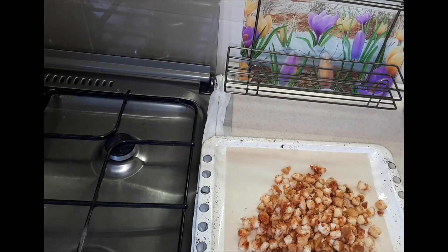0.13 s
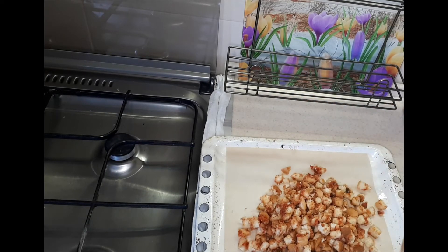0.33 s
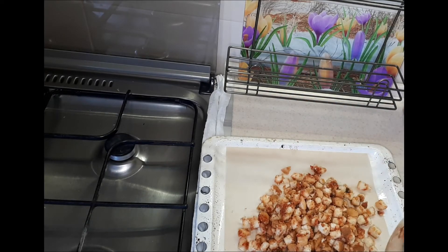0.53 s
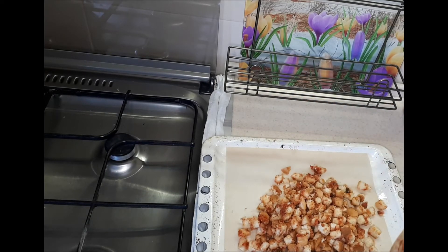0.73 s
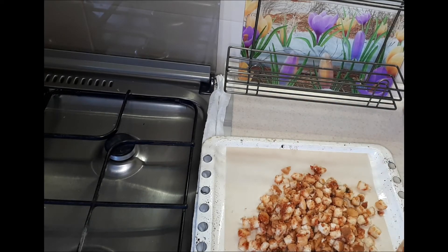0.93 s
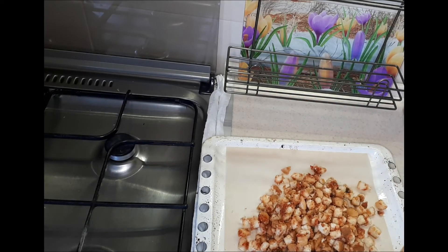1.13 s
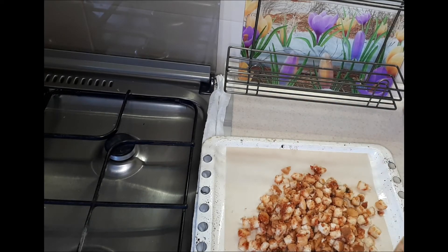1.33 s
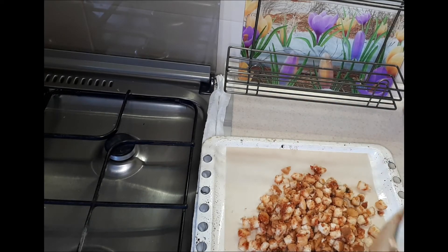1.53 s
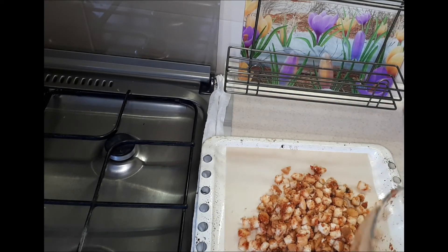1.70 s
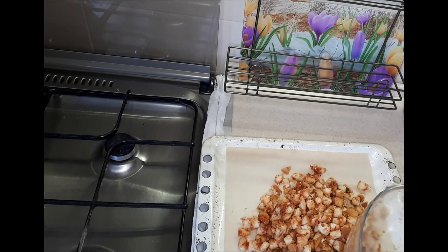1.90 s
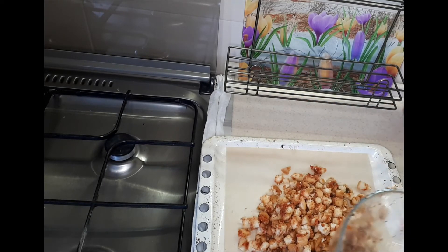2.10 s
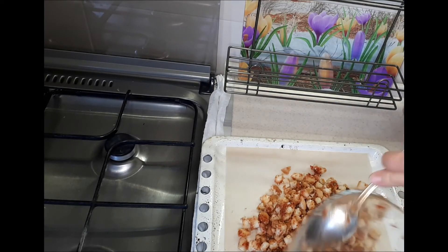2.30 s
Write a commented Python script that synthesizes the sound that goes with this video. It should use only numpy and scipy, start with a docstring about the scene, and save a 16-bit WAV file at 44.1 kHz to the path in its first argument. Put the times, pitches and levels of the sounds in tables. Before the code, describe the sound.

Dry croutons scrape, the tray knocks, then a glass bowl clinks and clanks against it

```python
"""A low wavering hum and a thin hiss come first, and croutons soon scrape over them.
A clack on the worktop, light ticks and knocks of a baking tray follow, then a faint swish as a glass
bowl swings over; it clinks, rings and clanks on the tray in a small, hard-walled kitchen.
Struck objects are sums of decaying modes, sliding is a burst of tiny contacts, and the steady sounds
are filtered noise and a tone; a decaying noise response serves as the room."""
import sys
import numpy as np
from scipy import signal
from scipy.fft import rfft, irfft
from scipy.io import wavfile
from scipy.ndimage import uniform_filter1d

SR = 44100
rng = np.random.default_rng(int(sys.argv[2]) if len(sys.argv) > 2 else 0)


def wav_out(sig):
    """Save sig, one row per channel (or a flat mono array), as 16-bit PCM at SR to the path in sys.argv[1]."""
    wavfile.write(sys.argv[1], SR, np.round(np.clip(np.atleast_2d(sig).T, -1, 1) * 32767).astype(np.int16))


N = 108133  # length in samples


def amp(db):
    """Level law: decibels to amplitude gain."""
    return 10 ** (np.asarray(db) / 20)


def evened(x):
    """Power normalisation: scales to rms 1."""
    return x / np.sqrt(np.mean(x ** 2) + 1e-20)


def read(points, hz):
    """Logarithmic frequency scale: interpolates a table along it."""
    f, value = np.transpose(points)
    return np.interp(np.log(hz + 1), np.log(f + 1), value)


def add(mix, s, sound):
    """Superposition: adds a sound in place from time s, cut at the end of the mix."""
    part = mix[:, round(s * SR):][:, :sound.shape[-1]]
    part += sound[..., :part.shape[1]]


def colour(x, points, size=2048):
    """Minimum-phase filtering: the Hilbert transform of the log gain supplies the phase."""
    hz = abs(np.fft.fftfreq(size, 1 / SR))
    log_gain = np.log(amp(read(points, hz)))
    response = np.fft.ifft(np.exp(np.conj(signal.hilbert(log_gain)))).real
    return signal.fftconvolve(x, response)


def click(body):
    """Impulse response: an ideal impulse takes on the body's spectrum."""
    return colour(np.ones(1), body)


def blend(a, b, likeness):
    """Interchannel coherence: the right channel shares part of the left; negative means inverted."""
    return np.array([a, likeness * a + np.sqrt(1 - likeness ** 2) * b])


def pair(size, likeness, points=None):
    """Diffuse field: stereo noise whose coherence depends on frequency."""
    hz = np.fft.rfftfreq(size, 1 / SR)
    a, b = rfft(rng.standard_normal((2, size)))
    spectrum = blend(a, b, np.clip(read(likeness, hz), -1, 1))
    if points is not None:
        spectrum = spectrum * amp(read(points, hz))
    return irfft(spectrum, size)


def narrow(hz, width_hz, likeness):
    """Modulated noise: a narrow band around a steady or moving pitch."""
    offset = np.fft.fftfreq(N, 1 / SR)
    noise = rng.standard_normal((2, N)) + 1j * rng.standard_normal((2, N))
    # the gain is half at the edges of the width
    envelope = np.fft.ifft(np.fft.fft(noise) / (1 + (2 * offset / width_hz) ** 2))
    carrier = np.exp(2j * np.pi * np.cumsum(hz * np.ones(N)) / SR)
    a, b = (envelope * carrier).real
    return evened(blend(a, b, likeness))


LATE_LOSS_DB = 5  # extra loss reached at a quarter of a second


def dying(t, t60):
    """Exponential decay, steepened by a loss in dB that grows with time squared."""
    return amp(-60 * t / t60 - LATE_LOSS_DB * (4 * t) ** 2)


# likeness of left and right in the diffuse sound: (frequency [Hz], coherence [-1 to 1])
LIKENESS = [(80, 0.77), (300, 0.71), (600, 0.56), (1200, -0.25), (2500, -0.013), (8000, -0.0038)]
# spectrum of the room tone: (frequency [Hz], relative level [dB])
FLOOR_SPECTRUM = [(20, -23.5), (60, -5), (130, 0), (200, -10.5), (280, -10.5), (400, -16.5), (1000, -19.5),
                  (2500, -23), (6000, -30), (10000, -32), (16000, -29.5)]
# slow changes of the room tone: (time [s], level relative to FLOOR_DB [dB])
FLOOR_LEVEL = [(0, -0.5), (.7, 1), (1.5, -2), (1.75, -1), (2.1, 2), (2.45, -1)]
FLOOR_DB = -67.5


def room_tone():
    """Stationary noise: a coloured diffuse field with a slowly changing level."""
    level_db = FLOOR_DB + np.interp(np.arange(N) / SR, *np.transpose(FLOOR_LEVEL))
    return amp(level_db) * evened(pair(N, LIKENESS, FLOOR_SPECTRUM))


# bands of the thin hiss: (centre [Hz], width [Hz], level [dB], left-right likeness [0 to 1])
HISS_BANDS = [(7800, 1600, -79, 0.24), (7890, 72, -76, 0.23), (13160, 32, -86, 0.093)]


def hiss():
    """Band-limited noise: steady high bands add up to a thin hiss."""
    return sum(amp(db) * narrow(hz, width, likeness) for hz, width, db, likeness in HISS_BANDS)


# level course of the hum: (time [s], level relative to HUM_DB [dB])
HUM_LEVEL = [(0.0, -60), (0.16, -63), (0.46, -53), (0.81, -63.5), (0.89, -49.5), (0.93, -75), (1.05, -56),
             (1.08, -63), (1.19, -53.5), (1.75, -67), (1.77, -56), (1.96, -64), (2.01, -53.5), (2.05, -66),
             (2.24, -58), (2.29, -72), (2.37, -55.5), (2.45, -62)]
HUM_HZ, HUM_WANDER_HZ, HUM_DB = 91.4, 3.68, -1  # wander is the rms deviation
HUM_NOISE_DB, HUM_WIDTH_HZ = -5, 41  # noise relative to the tone


def hum():
    """Frequency modulation: a low sine wanders in pitch inside a band of noise."""
    t = np.arange(N) / SR
    wander = evened(uniform_filter1d(rng.standard_normal(N), size=3000))
    phase = 2 * np.pi * np.cumsum(HUM_HZ + HUM_WANDER_HZ * wander) / SR
    tone = np.sqrt(2) * np.sin(phase)  # rms 1
    noise = amp(HUM_NOISE_DB) * narrow(HUM_HZ, HUM_WIDTH_HZ, 0.82)
    return amp(HUM_DB + np.interp(t, *np.transpose(HUM_LEVEL))) * (tone + noise)


# reverberation of the kitchen: (frequency [Hz], t60 before the late loss [s])
KITCHEN_T60 = [(120, 0.33), (400, 0.41), (1200, 0.39), (3000, 0.36), (7000, 0.33), (15000, 0.23)]
DIRECT, EARLY = 0.1, 0.23  # gains of the direct sound and of the early reflections
EARLY_T60_S, BUILD_S = 0.041, 0.00098  # early decay time, time constant of the build-up
CONTACT_DB = 13  # gain of all sounds sent into the room


def kitchen(x, direct=DIRECT, early=EARLY, size=32768):
    """Reverberation: convolution with direct sound, early cluster and tail, drawn anew each time."""
    t = np.arange(size) / SR
    hz, at, z = signal.stft(pair(size, LIKENESS), SR, nperseg=256)
    late_decay = dying(at, read(KITCHEN_T60, hz)[:, None])
    early_decay = early * amp(-60 * at / EARLY_T60_S)
    z = z * np.hypot(late_decay, early_decay)
    response = signal.istft(z)[1][:, :size] * (1 - np.exp(-t / BUILD_S))
    response /= np.linalg.norm(response[0])  # left reflections have energy 1
    response[0, 0] += direct
    response[1, rng.integers(1, 10)] += direct  # a few samples later on the right
    return amp(CONTACT_DB) * signal.fftconvolve(x[None], response, axes=1)


GRAINS_PER_S, GRAIN_SPREAD_DB = 1200, 5.5


def grains(length_s):
    """Shot noise: random contacts of uneven size and sign swell and fade; energy 1."""
    u = np.linspace(0, 1, max(int(length_s * SR), 20))
    chance, size, sign = rng.random((3, SR // 2))[:, :len(u)]
    strength = amp(-GRAIN_SPREAD_DB * np.log(size + 1e-9))  # exponentially spread in dB
    x = (chance < GRAINS_PER_S / SR) * strength * np.sign(sign - 0.5)
    x = x * np.sqrt(u * (1 - u))
    return x / (np.linalg.norm(x) + 1e-9)


# sliding and handling of the croutons:
# (time [s], length [s], level before the room gain [dB], grit relative to rub [dB])
SCRAPES = [(0.099, 0.16, -41, -5.5), (0.215, 0.048, -20.5, -13.5), (0.243, 0.032, -27, 4.5),
           (0.292, 0.024, -24.5, -12), (0.435, 0.027, -28, -19.5), (0.556, 0.31, -46, -20)]
# spectrum of the dull rubbing: (frequency [Hz], relative level [dB])
RUB = [(35, -31), (70, 9), (170, 8), (240, 4), (330, 8.5), (560, 7), (740, 3), (1100, -11), (1900, -2.5),
       (2400, -15.5), (3100, -13), (4500, -16), (15000, -55)]
# spectrum of the crisp grit: (frequency [Hz], relative level [dB])
GRIT = [(300, -25), (1200, -20), (1900, 2.5), (2400, -3.5), (2750, 5.5), (3100, 5), (3500, -3.5),
        (4500, -10), (5200, -0.5), (5800, -10), (6400, -3), (7700, -1.5), (9100, -17), (10500, -4),
        (12500, -15), (15500, -12)]


def scrape(length_s, db, grit_db):
    """Sliding friction: many dry contacts form a dull rub with crisp grit on top."""
    rub = colour(grains(length_s), RUB)
    grit = amp(grit_db) * colour(grains(length_s), GRIT)
    return amp(db) * kitchen(rub + grit)


RING_RISE_S = 0.00029  # rise time constant of the ring in sharp hits
BLUR, BLUR_HZ = 0.85, 47  # depth and bandwidth of the wavering


def ringing(modes, rise_s):
    """Modal superposition: reflections make each dying mode waver, differently on each side."""
    t = np.arange(SR // 2) / SR
    offset, out = np.fft.fftfreq(len(t), 1 / SR), 0
    for hz, db, t60 in modes:
        random_phase = 2j * np.pi * rng.random((2, len(t)))
        waver = np.fft.ifft(np.exp(random_phase - (offset / BLUR_HZ) ** 2))
        fade = (1 - np.exp(-t / rise_s)) * dying(t, t60)
        steady = np.exp(2j * np.pi * rng.random((2, 1)))
        swing = fade * (steady + BLUR * waver / np.std(waver))
        # wavering leaves the mode's energy unchanged
        swing *= np.linalg.norm(fade) / np.linalg.norm(swing, axis=1, keepdims=True)
        out = out + amp(db) * (swing * np.exp(2j * np.pi * hz * t)).real
    return out


def hit(body, modes, ring_db=0, direct=DIRECT, early=EARLY):
    """Impulsive excitation: a click in the room sets off the object's modes."""
    sound = kitchen(click(body), direct, early)
    add(sound, 0, amp(ring_db) * ringing(modes, RING_RISE_S))
    return sound


# hard clacks on the worktop: (time [s], level of click and ring together [dB])
CLACKS = [(0.8198, -11)]
# spectrum of their click: (frequency [Hz], relative level [dB])
CLACK_BODY = [(40, -23), (220, -8), (350, -0.5), (650, 2), (950, -4), (1250, 3), (1600, 2), (2000, 9),
              (2400, -4), (3200, 7.5), (3600, 2.5), (4100, -7), (5200, -11), (5800, -13), (7500, -15.5),
              (9000, -30.5), (15500, -27)]
# their ring: (frequency [Hz], relative level [dB], t60 before the late loss [s])
CLACK_MODES = [(715, -41, 0.61), (1604, -37, 0.77), (1850, -35, 0.43), (2000, -34.5, 0.78),
               (3110, -33, 0.51), (3143, -24.5, 0.38), (3220, -33.5, 0.59), (5045, -41.5, 0.67)]


def clack(db):
    """Hard impact: a broad click and quiet modes, as on the worktop."""
    return amp(db) * hit(CLACK_BODY, CLACK_MODES)


# light glassy ticks: (time [s], level of click and ring together [dB],
# extra ring level [dB], tilt of the click [dB per octave])
TICKS = [(1.0114, -30.5, 1.5, -1), (1.5721, -43, -22, 0.5)]
# spectrum of their click before the tilt: (frequency [Hz], relative level [dB])
TICK_BODY = [(200, -3), (1500, -8), (2700, 3), (3400, 7.5), (4500, -3), (5500, -2), (7200, 9.5),
             (8800, -11), (11200, -6), (12500, -11.5), (15500, -10)]
# their ring: (frequency [Hz], relative level [dB], t60 before the late loss [s])
TICK_MODES = [(3160, -20, 0.18), (6100, -21.5, 0.35), (6090, -22, .36), (7200, -31, 0.2),
              (7960, -21.5, 0.22), (9200, -33, 0.37), (10460, -27, .25), (11160, -23, .22),
              (11380, -30, 0.28), (14900, -30, .22)]
PRESENCE_HZ = 2960  # pivot of the tilt, and reference point of a knock's force


def tick(db, ring_db, tilt_db):
    """Light impact: a spectrally tilted click excites high glassy modes."""
    body = [(hz, level + tilt_db * np.log2(hz / PRESENCE_HZ)) for hz, level in TICK_BODY]
    return amp(db) * hit(body, TICK_MODES, ring_db)


# tray knocks: (time [s], level before the room gain [dB], bass [dB], middle [dB], treble [dB],
# extra ring level [dB], chatter length [s])
KNOCKS = [(1.1328, -7.5, 3.5, -0.5, -1, -7.5, 0.00925), (1.154, -10.5, 3.5, 1, -6, -5, 0.0052),
          (1.21, -11.5, 3.5, -1, -10.5, -5.5, 0.044), (1.313, -17, 2.5, 2, -18, -7, .004)]
# spectrum of the dull part: (frequency [Hz], relative level [dB])
THUD = [(35, -42), (70, -30), (130, -5), (230, -5.5), (340, -0.5), (680, 0.5), (950, 1.5), (1350, 11.5),
        (2000, 0.5), (2400, -3), (3000, 1), (3550, 6), (3900, -3.5), (4300, 5.5), (4800, -0.5), (5200, -2),
        (6800, -6), (7800, -1.5), (9000, -10.5), (15500, -9)]
# tray modes: (frequency [Hz], level relative to RING_DB [dB], t60 [s])
TRAY_MODES = [(328, -11, 0.065), (620, -17, 0.047), (705, -10.5, 0.19), (1211, -7, 0.063), (1353, 8, 0.021),
              (1574, -10, 0.046), (2070, -8.5, 0.081), (2956, -8.5, 0.16), (3165, 2.5, 0.056),
              (3200, -11, 0.14), (3577, -1, 0.047), (4270, -1, 0.12), (5090, -8, 0.11), (8060, -6.5, 0.073)]
BASS_HZ, MIDDLE_HZ, TREBLE_HZ = 330, 1160, 11000
CHATTER, RING_DB = 0.81, -29  # grains beside a unit first contact; base level of the ring


def ring(modes):
    """Modal superposition: exponentially dying sines of a struck object."""
    t = np.arange(SR // 2) / SR
    return sum(amp(db - 60 * t / t60) * np.sin(2 * np.pi * (hz * t + rng.random()))
               for hz, db, t60 in modes)


def strike(body, modes, ring_db):
    """Impulse response of a struck object: its click and its modes together."""
    sound, start = amp(RING_DB + ring_db) * ring(modes), click(body)
    sound[:len(start)] += start
    return sound


def knock(db, bass_db, middle_db, treble_db, ring_db, length_s):
    """Source and resonator: a bump with brief chatter drives the tray; softer contacts are duller."""
    contact = CHATTER * grains(length_s)
    contact[0] += 1
    force_spectrum = [(BASS_HZ, bass_db), (MIDDLE_HZ, middle_db), (PRESENCE_HZ, 0), (TREBLE_HZ, treble_db)]
    force = colour(contact / np.linalg.norm(contact), force_spectrum)
    return amp(db) * kitchen(signal.fftconvolve(force, strike(THUD, TRAY_MODES, ring_db)))


# faint swish as the bowl swings over: (time [s], centre [Hz], level [dB])
SWISH = [(1.7, 1385, -83), (1.82, 1450, -77), (1.92, 1780, -70.5), (2.031, 1780, -70.5),
         (2.141, 1567, -64.5), (2.252, 1480, -66)]
SWISH_WIDTH_HZ = 560


def swish():
    """Moving noise band: it fades in, glides in pitch and level, then holds its last values."""
    at, hz, db = np.transpose(SWISH)
    t = np.arange(N) / SR
    onset = np.clip((t - at[0]) * 20, 0, 1)
    return amp(np.interp(t, at, db)) * onset * narrow(np.interp(t, at, hz), SWISH_WIDTH_HZ, 0)


# contacts of the glass rim: (time [s], level before the room gain [dB])
CLINKS = [(2.1815, -2.5), (2.1835, -2.5), (2.1865, -5), (2.205, -19)]
# crack of the contact on glass: (frequency [Hz], relative level [dB])
CRACK = [(35, -37), (110, -14), (250, -19), (450, -9), (750, 4), (1100, -1), (1600, 8.5), (2200, 1.5),
         (2800, 5.5), (4300, 1), (4950, 7), (5800, -2), (7900, -1), (10500, -4), (15500, -5.5)]


def clink(db):
    """Impulsive contact: a bright crack of the glass rim, reverberated by the room."""
    return amp(db) * kitchen(click(CRACK))


# the bowl rings on: (start time [s], level of all modes together [dB])
BOWL_START = (2.184, -21)
# bowl modes: (frequency [Hz], relative level [dB], t60 before the late loss [s])
BOWL_MODES = [(942.2, -10, 0.46), (1758, -5, .28), (1715, -5, 0.56), (1967, -3.5, 0.27), (2600, 1.5, 0.43),
              (2625, 5, 0.47), (2721, -1.5, 0.47), (2712, -8, 0.52), (2970, -8, 0.31), (3712, 3.5, 0.5),
              (3850, -5, 0.3), (4860, -21, .24), (4870, 0.5, 0.4), (5240, -15, 0.54), (6220, -5, 0.22),
              (7530, 1, 0.2), (8300, 2.5, 0.085), (12120, -13, .2), (12615, -3, 0.16)]
GLASS_RISE_S = 0.0019  # rise time constant


def bowl_ring(db):
    """Free vibration: the glass bowl's modes rise quickly and die away."""
    return amp(db) * ringing(BOWL_MODES, GLASS_RISE_S)


# clanks of the held bowl on the tray: (time [s], level of click and ring together [dB])
CLANKS = [(2.4245, 0.5)]
# spectrum of their click: (frequency [Hz], relative level [dB])
CLANK_BODY = [(40, -52), (200, -19), (420, -21.5), (650, -1), (870, -4), (1100, -5.5), (1600, 7.5),
              (2600, 4.5), (4000, 9), (4400, -3.5), (5000, 4.5), (6700, -9), (7500, 9), (8600, -7),
              (13400, -7), (15500, -13)]
# their short ring: (frequency [Hz], relative level [dB], t60 before the late loss [s])
CLANK_MODES = [(679, -33, 0.34), (863, -31, 0.18), (1612, -18, 0.11), (1945, -32, .2), (2710, -25, 0.17),
               (3110, -11.5, 0.049), (3156, -16.5, 0.087), (3895, -22, 0.17), (5050, -26.5, 0.14),
               (6273, -21.5, 0.15), (6870, -25, 0.13), (7720, -26, 0.19)]


def clank(db):
    """Damped impact: short modes, with stronger direct sound and early reflections."""
    return amp(db) * hit(CLANK_BODY, CLANK_MODES, direct=0.2, early=1.6)


LEFT_DB = 1  # left raised and right lowered by this much


def scene():
    """Superposition: all contacts over the steady sounds, a little to the left."""
    mix = swish() + room_tone() + hiss() + hum()
    events = [(knock, KNOCKS), (clack, CLACKS), (clink, CLINKS), (bowl_ring, [BOWL_START]),
              (clank, CLANKS), (tick, TICKS), (scrape, SCRAPES)]
    for play, table in events:
        for s, *settings in table:
            add(mix, s, play(*settings))
    return mix * amp([[LEFT_DB], [-LEFT_DB]])


LOW_CUT_HZ, EDGE_HZ = 43, 15780


def record(dry):
    """Band limiting: the microphone's bass roll-off and the recorder's upper edge."""
    low_cut = signal.butter(2, LOW_CUT_HZ, "high", fs=SR, output="sos")
    dry = signal.sosfilt(low_cut, dry)
    high_cut = signal.firwin(511, EDGE_HZ, window=("kaiser", 9), fs=SR)
    return signal.oaconvolve(dry, high_cut[None], "same")


dry = scene()
out = record(dry)
wav_out(out)
```